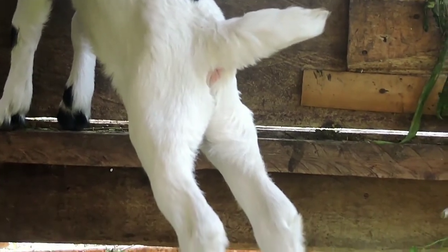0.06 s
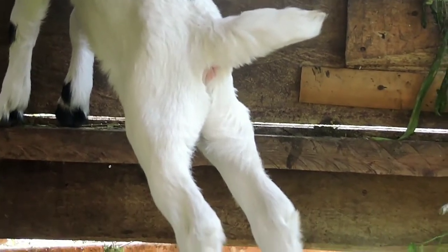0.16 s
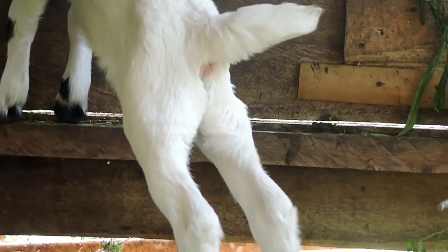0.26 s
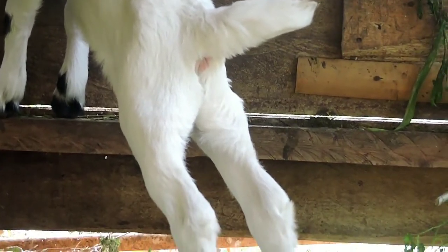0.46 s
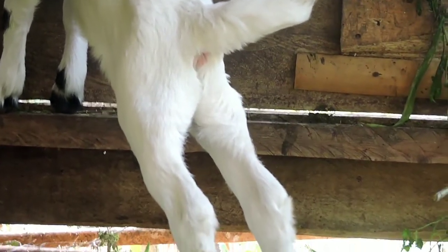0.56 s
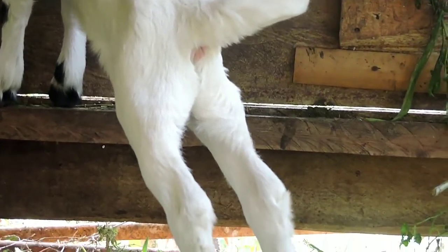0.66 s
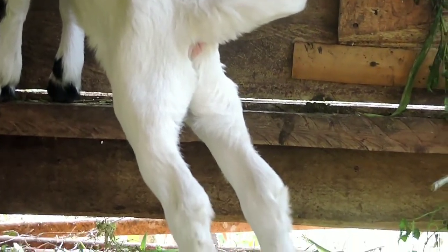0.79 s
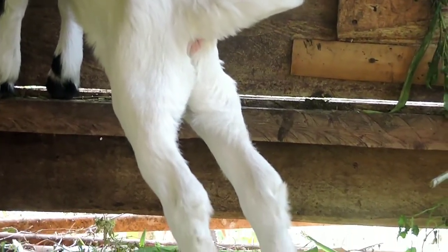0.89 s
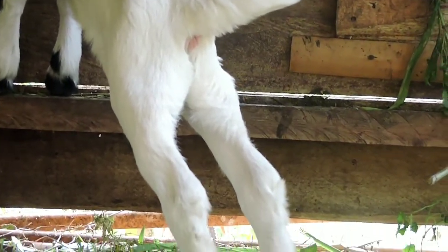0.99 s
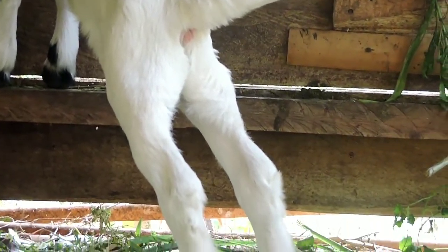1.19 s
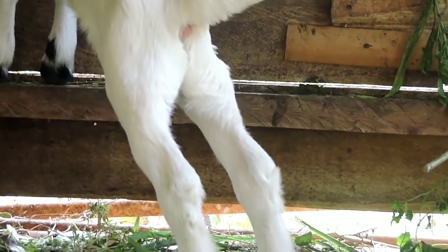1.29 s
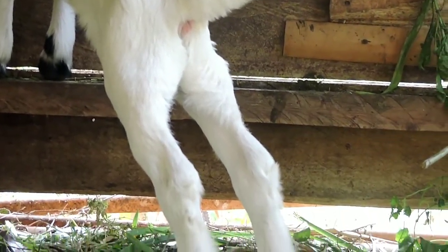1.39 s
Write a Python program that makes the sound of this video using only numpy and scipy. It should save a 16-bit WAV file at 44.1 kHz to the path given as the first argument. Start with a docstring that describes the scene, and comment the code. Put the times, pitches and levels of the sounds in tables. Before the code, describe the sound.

A young goat's bleat dominates: after a faint hoof tick at 0.09 seconds, a thin squeak rises and opens by 0.25 into a bright, nasal, rapidly quavering cry, turning hoarse and ending near 0.92. A lower, raspier kid overlaps from about 0.45 to 0.9. Light hooves knock and scuff boards from 0.95, clustering at 1.03-1.32. Short wooden pen reflections, left-leaning calls, low outdoor rumble and soft hiss throughout.

```python
"""A hoof tick and a thin squeak open the scene; the squeak swells into a high kid's quavering bleat.
A lower, hoarser kid joins halfway, then hooves knock and scuff on boards in a wooden pen.
Voices are harmonics and pulsed noise shaped by a throat; hooves are noise scuffs that ring a plank.
Plank walls answer with a short decaying-noise tail, over filtered-noise outdoor rumble and hiss."""
import sys
import numpy as np
from scipy import signal
from scipy.fft import rfft, irfft, next_fast_len
from scipy.io import wavfile
from scipy.ndimage import map_coordinates

SR = 44100
rng = np.random.default_rng(int(sys.argv[2]) if len(sys.argv) > 2 else 0)


def unload_audio(sound):
    """Save the sound as a 16-bit wav file, at the path given as the first command line argument."""
    columns = np.transpose(np.atleast_2d(sound))
    # keep every value between -1 and 1, then stretch to whole-number steps
    steps = np.round(np.clip(columns, -1, 1) * 32767)
    wavfile.write(sys.argv[1], SR, steps.astype(np.int16))


N = 63945

# high kid's quaver, turning points: t/s, pitch f/Hz
HIGH_QUAVER = [(.11, 403), (.181, 408.7), (.231, 474.2), (.276, 454), (.334, 487), (.379, 454.6),
               (.439, 489.4), (.491, 476.8), (.541, 487.7), (.594, 481.8), (.651, 486.6), (.709, 468.3),
               (.751, 484.9), (.829, 410.7), (.867, 450.4), (.905, 445.7)]
# high kid's lower harmonics, before the throat: t/s, level/dB
HIGH_LOWER_LEVEL = [(.09, -97), (.191, -61.5), (.234, -50.5), (.257, -43.5), (.31, -43), (.34, -51.5),
                    (.389, -43.5), (.42, -45.5), (.446, -55.5), (.521, -47.5), (.581, -47.5), (.651, -44.5),
                    (.708, -46), (.737, -43.5), (.787, -47.5), (.833, -51.5), (.868, -48.5), (.903, -67),
                    (.93, -90)]
# high kid's upper harmonics, before the throat: t/s, level/dB
HIGH_UPPER_LEVEL = [(.07, -68), (.121, -55), (.181, -48.5), (.228, -47), (.258, -37), (.282, -46.5),
                    (.318, -33.5), (.339, -41), (.352, -37.5), (.383, -50.5), (.402, -40), (.427, -36),
                    (.443, -31), (.457, -28), (.477, -51), (.521, -32.5), (.553, -46), (.585, -38),
                    (.626, -34.5), (.642, -39), (.672, -35.5), (.706, -47.5), (.755, -38), (.821, -51),
                    (.874, -41), (.92, -65)]
# high kid's colour, broad peaks with sharp narrow dips: f/Hz, level/dB
HIGH_COLOUR = [(310, -27), (465, -32), (905, -3.5), (1370, -7.5), (1470, -2.5), (1630, -2.5), (1815, -3),
               (1935, -21), (2060, -9.5), (2260, -3), (2420, 1), (2680, -3), (2870, -9.5), (3100, -15),
               (3330, -20.5), (3680, -15), (3900, -24.5), (4380, -30), (4900, -28), (5600, -31),
               (7100, -38), (8300, -35), (9400, -58), (15200, -69)]
# high kid's mouth: t/s, opening/0-1
HIGH_MOUTH = [(.16, 0.1), (.225, 0.19), (.26, 0.89), (.315, 0.82), (.338, 0.48), (.365, 0.9), (.415, 0.92),
              (.448, 0.13), (.5, 0.61), (.56, 0.05), (.62, 0.08), (.7, 0.25), (.8, .3), (.87, 0.68)]
# colour change from shut to fully open mouth: f/Hz, level/dB
MOUTH_OPENING = [(470, -3), (900, 1.5), (1380, 21), (1850, 2), (2060, -10), (2400, 5), (2850, 3),
                 (3300, 13), (3700, 20.5), (4400, -0.5), (8000, 9)]
# high kid's left over right: f/Hz, level/dB
HIGH_PAN = [(920, 17), (1420, 9.5), (1880, 8), (2420, 3.5), (2880, 4), (4100, 13), (8100, -0.5)]
# low kid's bleat, level before the throat: t/s, pitch f/Hz, level/dB
LOW_CALL = [(.365, 263, -67), (.406, 271.9, -73), (.461, 295.7, -51), (0.499, 288, -54.5),
            (0.557, 320.8, -53), (0.606, 301, -52.5), (0.671, 315.2, -53), (0.721, 305.3, -55),
            (0.767, 314.3, -50), (0.82, 309.7, -59), (0.874, 313, -68), (0.924, 300, -67)]
# low kid's throat colour: f/Hz, level/dB
LOW_THROAT = [(210, -36), (315, -22), (560, -9), (630, -2), (935, -3), (1235, -1), (1575, 2), (1875, -6),
              (2210, 0), (2540, -1), (3120, -12), (3720, -20), (5100, -27), (8100, -31), (12200, -50)]
# low kid's left over right: f/Hz, level/dB
LOW_PAN = [(620, 10), (1550, 9), (2420, 4), (5100, 0)]
# rasp colour relative to the harmonics: f/Hz, level/dB
RASP_TONE = [(500, -3), (2400, 0), (4000, 2), (7000, 7), (12000, 7)]
# hoof contacts, relative level: t/s, level/dB, decay t60/s, treble tilt/(dB per octave)
HOOF_CONTACTS = [(0.085, -51, 0.29, 1), (0.946, -54, 0.27, 3.5), (1.034, -47, 0.14, -0.5),
                 (1.126, -41.5, 0.088, 2), (1.136, -43.5, 0.076, -3), (1.201, -44, 0.085, 4),
                 (1.216, -46.5, 0.15, 1.1), (1.273, -46.5, 0.053, 5.5), (1.292, -47.5, 0.13, -3),
                 (1.32, -43.5, 0.023, 3.5)]
# struck board's resonances: f/Hz, width/Hz, level/dB
BOARD_MODES = [(713, 128, 5), (1000, 154, 0), (1330, 210, 2), (1710, 250, 2), (2890, 620, -10)]
# hoof scuff colour: f/Hz, level/dB
SCUFF_TONE = [(160, 4), (520, -1.5), (920, 8.5), (1720, 2.5), (3100, -5), (5100, -28), (9100, -28),
              (15200, -30)]
# pen's decay: f/Hz, t60/s
PEN_DECAY = [(210, 0.12), (1050, 0.08), (2550, 0.32), (8100, 0.087)]
# outdoor background colour, relative: f/Hz, level/dB
AIR_TONE = [(20, -4), (30, 13.5), (45, 3.5), (100, 1.5), (300, 1.5), (750, 1.5), (1500, -1), (2600, -4.5),
            (4500, -12.5), (8000, -19.5), (15500, -24.5)]
# background's left-right likeness: f/Hz, correlation
AIR_LIKENESS = [(30, .75), (100, .3), (300, 0), (900, .4), (3000, 0), (10000, 0)]

DIVIDE_HZ = 1876  # crossover from lower to upper harmonics
RASP_HZ = 2850  # the rasp follows the harmonics' level here
HIGH_LEAD_MS, LOW_LEAD_MS = 0.098, 0.036  # each call reaches the left ear first
HIGH_SHIMMER, LOW_SHIMMER, LOW_RASP = .25, .35, .35  # gains
HIGH_ECHO, LOW_ECHO, STEP_ECHO = .52, .55, .45  # gains into the pen's answer
AIR_DB = -53  # base level before drift and pan
TOP_HZ = 15800

TIME = np.arange(N) / SR  # s
LEFT_RIGHT = np.array([[.5], [-.5]])  # splits a left-over-right difference in half


def amp(db):
    """Decibels to gain."""
    return 10 ** (np.asarray(db) / 20)


def unit(x):
    """Scale to rms 1."""
    return x / np.sqrt(np.mean(x ** 2) + 1e-20)


def along(points, hz):
    """Read (f/Hz, value) points on a log frequency axis."""
    f, v = np.transpose(points)
    return np.interp(np.log(hz + 1), np.log(f + 1), v)


def eased(rows):
    """One value per sample for each column, gliding smoothly from point to point."""
    s, *cols = np.transpose(rows)
    index = np.arange(len(s))
    place = np.interp(TIME, s, index)
    place = np.floor(place) + .5 - .5 * np.cos(np.pi * (place % 1))
    return [np.interp(place, index, c) for c in cols]


def level(rows):
    """A (t/s, level/dB) curve per sample, dropping to -140 dB outside its span."""
    return np.interp(TIME, *np.transpose(rows), left=-140, right=-140)


def wobble(rate):
    """A smooth random curve, rate knots a second."""
    return map_coordinates(rng.standard_normal(N // 4), [TIME * rate], mode='wrap')


def filtered(x, response):
    """Shape x by a response of frequency."""
    m = next_fast_len(N + SR // 2)
    spectrum = rfft(x, m) * response(np.fft.rfftfreq(m, 1 / SR))
    return irfft(spectrum, m)[..., :N]


def voice(pitch, loudness, throat, pan, jitter, shimmer, rasp):
    """Harmonics of the vocal folds through the throat, with rasping noise puffed once a cycle."""
    phase = 2 * np.pi * np.cumsum(pitch * (1 + jitter * wobble(350))) / SR

    def colour(hz):
        return along(throat, hz) + LEFT_RIGHT * along(pan, hz)

    breath = rng.standard_normal((2, N)) * (1 + np.cos(phase))
    puffs = unit(filtered(breath, lambda hz: amp(colour(hz) + along(RASP_TONE, hz))))
    out = rasp * amp(loudness(RASP_HZ)) * puffs
    for k in range(1, 35):
        hz = k * pitch
        gain = amp(loudness(hz) + colour(hz)) * (1 + shimmer * wobble(110.42))
        out += np.sqrt(2) * gain * np.sin(k * phase + rng.uniform(0, 2 * np.pi))
    return out


def high_bleat():
    """A thin squeak opens into a quavering bleat, its moving mouth recolouring it; it ends hoarse."""
    pitch, = eased(HIGH_QUAVER)
    mouth, = eased(HIGH_MOUTH)
    lower, upper = level(HIGH_LOWER_LEVEL), level(HIGH_UPPER_LEVEL)
    hoarse = np.interp(TIME, [.73, .84], [1, 3.2])

    def loudness(hz):
        upper_share = .5 + .5 * np.tanh((hz - DIVIDE_HZ) / 140)
        opening_db = (mouth - .5) * along(MOUTH_OPENING, hz)
        return lower + (upper - lower) * upper_share + opening_db

    return voice(pitch, loudness, HIGH_COLOUR, HIGH_PAN,
                 jitter=0.0036 * hoarse, shimmer=HIGH_SHIMMER, rasp=0.13 * hoarse)


def low_bleat():
    """A lower, rougher bleat joins halfway, with one level curve for all its harmonics."""
    pitch, _ = eased(LOW_CALL)
    call_db = level([(s, db) for s, hz, db in LOW_CALL])
    return voice(pitch, lambda hz: call_db, LOW_THROAT, LOW_PAN,
                 jitter=0.005, shimmer=LOW_SHIMMER, rasp=LOW_RASP)


def left_first(x, lead_ms):
    """Advance the left channel and delay the right, by half the lead each."""
    return filtered(x, lambda hz: np.exp(np.outer([1j, -1j], np.pi * hz * lead_ms / 1000)))


def board(f):
    """Resonances of a struck plank, summed with alternating sign."""
    total = 0
    for k, (centre, width, db) in enumerate(BOARD_MODES):
        damping = 1j * f * width
        total = total + (-1) ** k * amp(db) * damping / (centre * centre - f * f + damping)
    return total


def hoof_steps(rise_s=0.0014, plank_db=-2, scrape_db=0.0, left_db=4):
    """Each contact is a short gritty scuff that also rings the board, both dying away together."""
    out = np.zeros((2, N))
    for s, db, t60, tilt in HOOF_CONTACTS:
        t = np.maximum(TIME - s, 0)

        def slope(hz):
            return amp(tilt * np.log2(np.clip(hz, 300, 5000)))

        ring = unit(filtered(rng.standard_normal(N), lambda hz: board(hz) * slope(hz)))
        grit = rng.standard_normal((2, N))
        scuff = unit(filtered(grit, lambda hz: amp(along(SCUFF_TONE, hz)) * slope(hz)))
        envelope = amp(db - 60 * t / t60) * (1 - np.exp(-t / rise_s))
        out += envelope * (amp(plank_db) * ring + amp(scrape_db) * scuff)
    return out * amp(left_db * LEFT_RIGHT)


def pen(x):
    """The pen's short, diffuse answer: stereo noise decaying at its own rate in each band."""
    hz, t, z = signal.stft(rng.standard_normal((2, SR // 2)), SR, nperseg=256)
    decay = amp(-60 * t / along(PEN_DECAY, hz)[:, None])
    tail = signal.istft(z * decay, SR, nperseg=256)[1]
    tail = tail / np.linalg.norm(tail[0])
    return signal.fftconvolve(x.mean(0)[None], tail, axes=1)[:, :N]


def air(pan_db=-0.2, drift_db=0.79):
    """Outdoor rumble and hiss: mid and side noise, its level flickering slightly."""
    def mid_side(hz):
        # this angle gives left and right the wanted likeness
        turn = np.arccos(np.clip(along(AIR_LIKENESS, hz), -1, 1)) / 2
        return amp(along(AIR_TONE, hz)) * [np.cos(turn), np.sin(turn)]

    mid, side = filtered(rng.standard_normal((2, N)), mid_side)
    gain = amp(AIR_DB + drift_db * wobble(36) + pan_db * LEFT_RIGHT)
    return gain * unit(np.array([mid + side, mid - side]))


def scene():
    """Both kids and the hooves, each answered by the pen, over the outdoor air."""
    sources = [(left_first(high_bleat(), HIGH_LEAD_MS), HIGH_ECHO),
               (left_first(low_bleat(), LOW_LEAD_MS), LOW_ECHO),
               (hoof_steps(), STEP_ECHO)]
    return sum(x + echo * pen(x) for x, echo in sources) + air()


def record(dry):
    """Cut everything above the band limit."""
    return filtered(dry, lambda hz: hz < TOP_HZ)


dry = scene()
out = record(dry)
unload_audio(out)
```